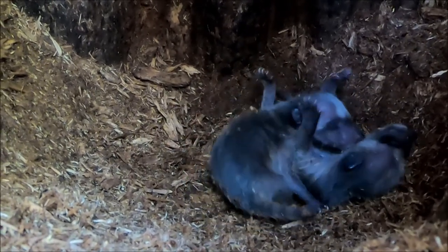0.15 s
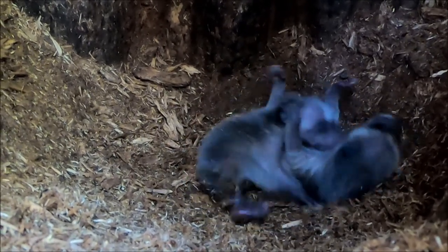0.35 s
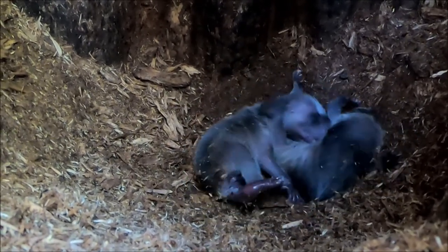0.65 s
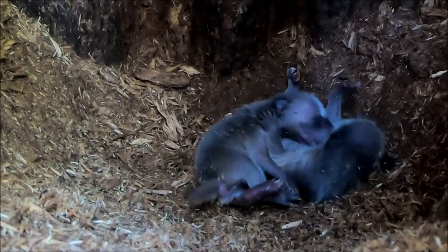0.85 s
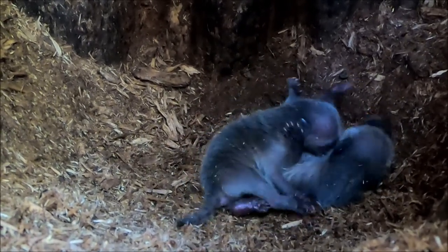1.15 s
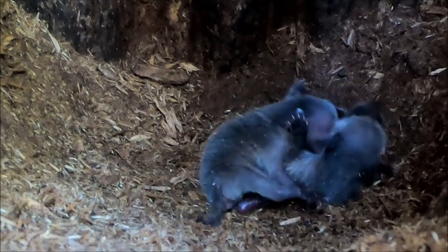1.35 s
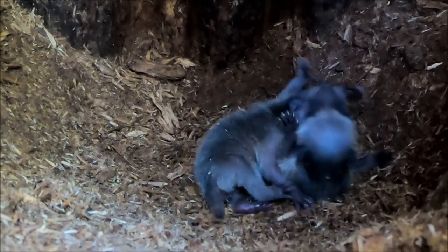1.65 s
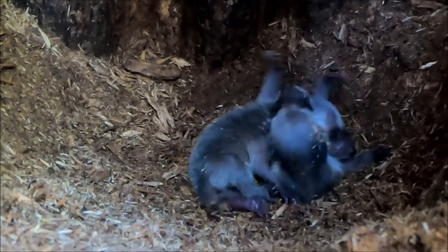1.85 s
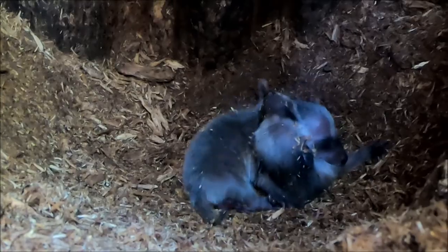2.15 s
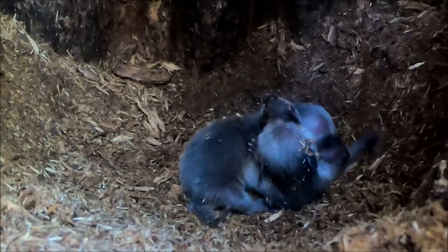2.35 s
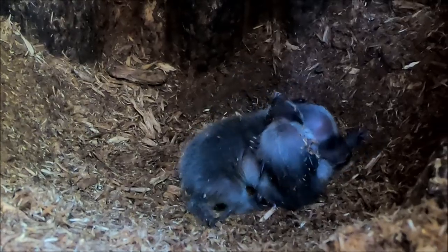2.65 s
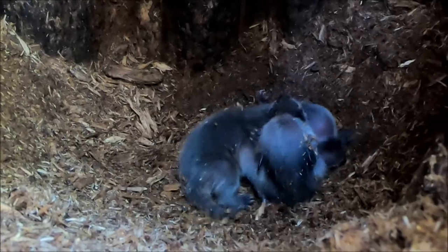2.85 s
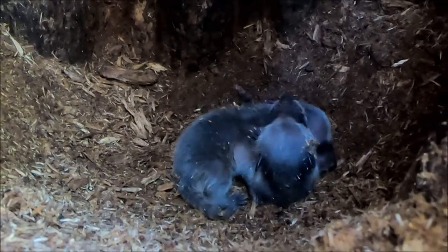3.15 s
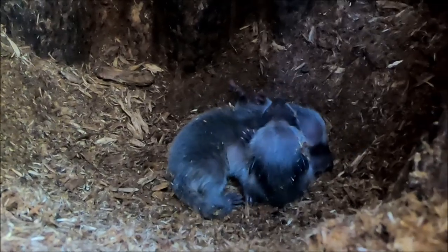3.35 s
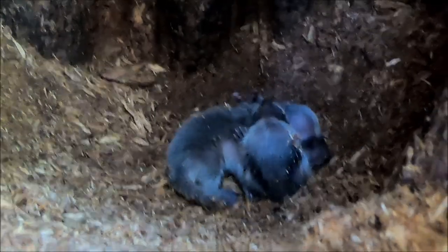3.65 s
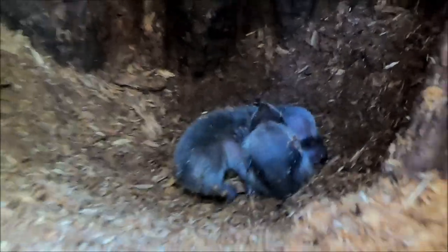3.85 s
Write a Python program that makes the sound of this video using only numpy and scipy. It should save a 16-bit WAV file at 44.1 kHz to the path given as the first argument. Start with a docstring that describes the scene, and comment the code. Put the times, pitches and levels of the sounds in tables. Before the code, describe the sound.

Two baby raccoons screech harshly in broken bursts close to the microphone in a hollow tree, a piercing cry then a shorter squeal, low bumps, then hoarse dull rasps and one last squealing cry.

```python
"""High cries of two baby raccoons, squirming in a hollow tree close to the microphone.
Four cries break between clean squeals and harsh screeches; dull rasps and low grunts join them.
Each voice is a stack of overtones plus pulsed noise, shaped by a throat spectrum; the hollow rings briefly.
Bumps are short low waves; rumble, faint air and the wood litter rustling at the end are shaped noise.
Bumps and rumble are mostly on the right."""
import sys
import numpy as np
from scipy import signal
from scipy.fft import rfft, irfft, next_fast_len
from scipy.io import wavfile
from scipy.ndimage import uniform_filter1d, map_coordinates

SR = 44100
rng = np.random.default_rng(int(sys.argv[2]) if len(sys.argv) > 2 else 0)


def file_out(sig):
    """Save sig as 16-bit WAV at sys.argv[1]."""
    # one column per channel
    cols = np.atleast_2d(sig).T
    # limit, then scale
    lim = np.clip(cols, -1, 1)
    pcm = np.round(lim * 32767).astype(np.int16)
    wavfile.write(sys.argv[1], SR, pcm)


N = 176400  # length in samples: 4 seconds
TOP_HZ = 14500  # nothing sounds above this
ATTACK_S, RELEASE_S = 0.016, 0.039  # fade-in and fade-out of a short call
SAG_OCT = .16  # pitch drop over a screech, rasp or grunt, in octaves
PITCH_SCATTER_OCT = .09  # typical random pitch offset of a screech or rasp, in octaves
SQUEEZES_PER_S = 36  # middle rate of throat squeezes; the actual rate wanders
GRUNT_ROUGH = 0.24  # roughness of grunts and yelps: 0 clean, 1 fully rough


def amp(db):
    """Turn decibels into a gain."""
    return 10 ** (np.asarray(db) / 20)


def unit(x):
    """Scale a sound to an average (rms) level of 1."""
    return x / np.sqrt(np.mean(x ** 2) + 1e-20)


def along(points, hz):
    """Read a curve of (Hz, value) points, spacing the frequencies logarithmically."""
    f, v = np.transpose(points)
    return np.interp(np.log(hz + 1), np.log(f + 1), v)


def curves(rows, t):
    """Read each column after the time column at the times t."""
    s, *cols = np.transpose(rows)
    return [np.interp(t, s, c) for c in cols]


def wobble(rate, size):
    """A smooth random curve through `rate` random points a second."""
    points = rng.standard_normal(8192)
    return map_coordinates(points, [np.arange(size) * rate / SR], mode="wrap")


def filtered(x, response):
    """Multiply the frequencies of x by a response, which may also turn their phase."""
    n = x.shape[-1]
    padded = next_fast_len(n + 4096)
    hz = np.fft.rfftfreq(padded, 1 / SR)
    return irfft(rfft(x, padded) * response(hz), padded)[..., :n]


def coloured(x, spectrum):
    """Shape x with a spectrum in dB, then bring its rms level to 1."""
    return unit(filtered(x, lambda hz: amp(along(spectrum, hz))))


def add(out, s, x):
    """Mix x into out from second s, dropping whatever lies outside."""
    start = round(s * SR)
    x = x[max(0, -start):]
    part = out[max(0, start):][:len(x)]
    part += x[:len(part)]


def envelope(t, length):
    """Fade in, hold and fade out; the fade-out is half done at the given length."""
    fade_in = np.clip(t / ATTACK_S, 0, 1)
    return fade_in * np.clip((length - t) / RELEASE_S + .5, 0, 1)


def folds(hz, rough, wander=.1, jitter=0.024, breaks=1.3, hiss=0.52):
    """Vocal folds: with roughness the pitch lurches, cycles split into subharmonics and pulsed noise joins."""
    n, rough = len(hz), np.clip(rough, 0, 1)
    lurch = rough * (jitter * wobble(500, n) + wander * rough * wobble(70, n))
    phase = 2 * np.pi * np.cumsum(hz * (1 + lurch)) / SR
    # fifteen equally strong harmonics with staggered phases
    tone = unit(sum(np.cos(k * phase + k * k) * (k * hz < TOP_HZ) for k in range(1, 16)))
    # slower waves at 1/2, 1/3 and 1/4 of the pitch
    split = sum(wobble(60, n) * np.cos(phase / k + rough * wobble(90, n)) for k in (2, 3, 4))
    tone = unit(tone * (1 + breaks * rough * split))
    # even out the level over about 12 ms
    tone = tone / np.sqrt(abs(uniform_filter1d(tone ** 2, size=512)))
    noise = unit(rng.standard_normal(n) * (1 + np.cos(phase / 2)))
    return tone + hiss * np.sqrt(rough) * noise


# Voice colour with the mouth wide open. Each row: frequency in Hz, relative level in dB.
WIDE_OPEN_COLOUR = [(350, -19), (1250, -9), (1800, -4.5), (3600, 5.5), (4400, -7), (5400, 5.5),
                    (6400, -8.5), (7900, -18), (9800, -40), (11800, -28), (14500, -46)]
# Voice colour with the mouth half shut, also heard in the rasps. Each row: frequency in Hz, relative level in dB.
HALF_SHUT_COLOUR = [(330, -7), (1300, 0), (1650, 5), (3800, -6.5), (4700, -22.5), (9500, -47),
                    (12000, -32.5), (14500, -66.5)]


def throat(mouth):
    """Blend the two voice colours: the wider the mouth, the brighter the voice."""
    hz = np.geomspace(100, TOP_HZ, 200)
    half_shut, wide = along(HALF_SHUT_COLOUR, hz), along(WIDE_OPEN_COLOUR, hz)
    return np.transpose([hz, (1 - mouth) * half_shut + mouth * wide])


def short_call(length, hz, fall_oct, rough, spectrum, slide_oct=0, rattle_db=3.0, rattle_rate=240):
    """A rattling call with falling pitch; a squeeze can make pitch and resonances jump up and slide down."""
    t = np.arange(0, length + RELEASE_S, 1 / SR)
    pitch = hz * 2 ** (fall_oct * (.5 - t / length))
    rattle = amp(rattle_db * rough * wobble(rattle_rate, len(t)))
    voice = coloured(folds(pitch, rough) * rattle, spectrum)
    squeezes = np.cumsum(SQUEEZES_PER_S * np.exp(.5 * wobble(SQUEEZES_PER_S, len(t)))) / SR
    # playing the voice faster or slower moves pitch and resonances together
    speed = 2 ** (-slide_oct * signal.sawtooth(2 * np.pi * squeezes))
    return map_coordinates(voice, [np.cumsum(speed)], mode="mirror") * envelope(t, length)


def pitch_scatter():
    """A random pitch factor, so that no two calls sit on the same note."""
    return 2 ** (PITCH_SCATTER_OCT * rng.standard_normal())


# Harsh screeches. Each row: start in seconds, length in seconds, level in dB before the hollow,
# mouth opening (0 half shut, 1 wide).
SCREECH_CALLS = [(-.014, 0.026, -32.5, 1.04), (.027, 0.06, -41, .88), (.106, 0.093, -44, .53),
                 (.2, 0.083, -50.5, .25), (.285, .09, -53.5, 0.07), (.55, 0.077, -60.5, .33),
                 (.626, 0.047, -42.5, 1), (.668, 0.033, -32, 1.11), (.711, .06, -34, 1.02),
                 (.789, .053, -31, 1.01), (.839, .067, -31, .88), (.918, 0.18, -32, 1),
                 (1.1, 0.027, -27, 1.06), (1.135, 0.092, -33.5, .91), (1.212, 0.085, -37, .67),
                 (1.29, .13, -46.5, .19), (1.765, .06, -49, .5), (1.811, 0.044, -35, .95),
                 (1.897, 0.053, -39.5, .9), (1.951, 0.066, -44, .3), (3.456, 0.044, -44.5, .74),
                 (3.502, 0.037, -31.5, .5), (3.57, 0.04, -42, .67), (3.653, .1, -43.5, .7)]


def screeches(middle_hz=1744, rough=.76, slide_oct=.05):
    """Very rough high calls, brighter as the mouth opens; each squeeze slides from above to below the pitch."""
    out = np.zeros(N)
    for s, length, db, mouth in SCREECH_CALLS:
        hz = middle_hz * pitch_scatter()
        add(out, s, amp(db) * short_call(length, hz, SAG_OCT, rough, throat(mouth), slide_oct))
    return out


# Left-right balance of the voice. Each row: frequency in Hz, left louder than right by this many dB.
VOICE_BALANCE = [(700, -2), (1150, 15), (1600, -11.5), (2700, 0)]


def hollow(x, hollow_hz=1296, width_hz=240, t60_s=0.13, ring_db=-2):
    """A trunk resonance turns the phase between the sides; the walls add a ring that dies away quickly."""
    def turn(f):
        real, imaginary = hollow_hz ** 2 - f * f, 1j * f * width_hz
        return (real - imaginary) / (real + imaginary)

    def two_sides(f):
        half_db = along(VOICE_BALANCE, f) / 2
        return np.array([amp(half_db), turn(f) * amp(-half_db)])

    pair = filtered(x, two_sides)
    t = np.arange(SR // 10) / SR  # the ring stops after 0.1 s
    # at this rate the ring would fall by 60 dB in t60_s
    tail = rng.standard_normal((2, len(t))) * np.exp(-np.log(1000) * t / t60_s)
    ring = signal.fftconvolve(x[None], tail / np.linalg.norm(tail[0]), axes=1)[:, :N]
    return pair + amp(ring_db) * ring


# Rise and fall of the rumble. Each row: time in seconds, middle level in dB on the right.
RUMBLE_LEVEL = [(0, -39.5), (1.8, -31.5), (2.3, -45.5), (2.75, -51), (3.4, -42)]
# Colour of the rumble. Each row: frequency in Hz, relative level in dB.
RUMBLE_COLOUR = [(35, 0.5), (110, -6.5), (300, -39), (1500, -77.5)]


def rumble(lumps_db=4.0):
    """Deep noise whose level swells and dips at random, separately drawn for each side."""
    noise = coloured(rng.standard_normal((2, N)), RUMBLE_COLOUR)
    level_db = curves(RUMBLE_LEVEL, np.arange(N) / SR)[0]
    return noise * amp(level_db + lumps_db * wobble(14, N))


# Colour of the air noise. Each row: frequency in Hz, relative level in dB.
AIR_COLOUR = [(1200, 3), (3500, -23), (7000, -15.5), (14000, -50)]


def air(level_db=-66):
    """Faint steady noise, separately drawn for each side."""
    return amp(level_db) * coloured(rng.standard_normal((2, N)), AIR_COLOUR)


# Low grunts, alone or under a screech. Each row: start in seconds, length in seconds,
# level in dB before the hollow, middle pitch in Hz.
GRUNT_CALLS = [(0.038, 0.03, -43.5, 471), (0.214, 0.032, -48, 740), (0.844, 0.041, -42, 497),
               (.944, 0.028, -41, 451.5), (0.984, 0.032, -44, 1010), (1.056, .039, -41, 921),
               (1.404, 0.031, -39, 461), (2.74, 0.037, -38, 535), (3.835, .08, -53.5, 1030)]
# Dull voice colour of grunts and yelps. Each row: frequency in Hz, relative level in dB.
GRUNT_COLOUR = [(400, 2), (1100, 2), (5000, -39.5)]


def grunts():
    """Short, slightly rough calls through a dull throat."""
    out = np.zeros(N)
    for s, length, db, hz in GRUNT_CALLS:
        add(out, s, amp(db) * short_call(length, hz, SAG_OCT, GRUNT_ROUGH, GRUNT_COLOUR))
    return out


# Plunging yelps. Each row: start in seconds, level in dB before the hollow, middle pitch in Hz.
YELP_CALLS = [(.36, -46, 600.4), (1.746, -47.5, 1264), (1.998, -43, 1200), (2.829, -43.5, 1822),
              (2.934, -46, 1970), (2.998, -39.5, 700.5), (3.318, -41.5, 1150), (3.501, -34.5, 1171)]


def yelps(length_s=.026, fall_oct=.45):
    """Very short calls with the grunt's colour and a steeply falling pitch."""
    out = np.zeros(N)
    for s, db, hz in YELP_CALLS:
        add(out, s, amp(db) * short_call(length_s, hz, fall_oct, GRUNT_ROUGH, GRUNT_COLOUR))
    return out


# Clean squeals, one list of rows for each. Each row: time in seconds, pitch in Hz,
# level in dB before the hollow.
SQUEAL_PATHS = [
    [(1.215, 1797, -34.5), (1.27, 1746, -40)],
    [(1.83, 1882, -36), (1.865, 1469, -42.5), (1.897, 1844, -40), (1.925, 1637, -42), (1.995, 1592, -49.5)],
    [(2.04, 2035, -53), (2.08, 2140, -77)],
    [(3.6, 1881, -39), (3.635, 1490, -43.5), (3.657, 1719, -43.5), (3.672, 1411, -36.5), (3.72, 1797, -46),
     (3.745, 1503, -43.5), (3.76, 1687, -38.5), (3.785, 1495, -40), (3.825, 1367, -58)],
]


def squeals(mouth=0.99, rough=.22, soften_hz=4300):
    """Stretches where the folds hold a clean, swooping pitch, with softened high overtones."""
    out = np.zeros(N)
    for rows in SQUEAL_PATHS:
        t = np.arange(rows[0][0], rows[-1][0], 1 / SR)
        hz, db = curves(rows, t)
        voice = filtered(folds(hz, rough), lambda f: 1 / (1 + (f / soften_hz) ** 4))
        fades = signal.windows.tukey(len(t), .1)
        add(out, t[0], coloured(voice, throat(mouth)) * amp(db) * fades)
    return out


# Bumps on the microphone. Each row: time of the middle in seconds, strength in dB on the right
# (the wave itself peaks a little lower).
BUMP_HITS = [(1.305, -16.5), (1.631, -16), (1.724, -17.5), (1.791, -15.5), (2.088, -19), (3.464, -23.5)]


def bumps(hz=79, width_s=0.0042):
    """Each bump is a brief low wave inside a bell-shaped swell."""
    out = np.zeros(N)
    for s, db in BUMP_HITS:
        t = np.arange(N) / SR - s
        out += amp(db) * np.sin(2 * np.pi * hz * t) * np.exp(-(t / width_s) ** 2)
    return out


def handling(left_db=-13):
    """Bumps and lumpy rumble, mostly on the right."""
    return (bumps() + rumble()) * amp([[left_db], [0]])


# Hoarse rasps. Each row: start in seconds, length in seconds, level in dB before the hollow.
RASP_CALLS = [(2.178, .03, -65), (2.403, 0.12, -55.5), (2.585, 0.049, -50.5), (2.698, .095, -44),
              (2.815, .05, -37), (2.874, 0.11, -40.5), (2.975, .065, -37), (3.07, 0.057, -40),
              (3.131, .1, -37.5), (3.232, .12, -38.5), (3.355, 0.087, -44.5)]


def rasps(middle_hz=844.7, rough=.75, slide_oct=.13):
    """Low, very rough calls with the mouth half shut and a wide slide at each squeeze."""
    out = np.zeros(N)
    for s, length, db in RASP_CALLS:
        hz = middle_hz * pitch_scatter()
        add(out, s, amp(db) * short_call(length, hz, SAG_OCT, rough, HALF_SHUT_COLOUR, slide_oct))
    return out


# Colour of the rustling litter. Each row: frequency in Hz, relative level in dB.
LITTER_COLOUR = [(500, 2), (11000, -9.5), (15000, -33.5)]


def litter(start_s=3.71, full_s=3.886, level_db=-55, rise_db=20):
    """Crumbled wood rustles ever louder up to full_s: noise with a quickly flickering level."""
    t = np.arange(N) / SR
    # rise_db below full at start_s, and fainter still before
    swell_db = level_db + rise_db * np.minimum((t - full_s) / (full_s - start_s), 0)
    flicker = amp(2.2 * wobble(900, N))
    return coloured(rng.standard_normal((2, N)) * flicker, LITTER_COLOUR) * amp(swell_db)


def cries(peak_s=1.14, width_s=.17, shrill_db=5, shrill_hz=7000):
    """The whole voice; extra treble makes it shriller at the height of the long cry."""
    voice = screeches() + grunts() + yelps() + squeals() + rasps()
    strain = np.exp(-np.square((np.arange(N) / SR - peak_s) / width_s))
    return voice + amp(shrill_db) * strain * filtered(voice, lambda hz: hz > shrill_hz)


def scene():
    """The cries in the hollow, with handling noise, litter and air."""
    return hollow(cries()) + handling() + litter() + air()


def record(dry):
    """Remove everything from the band limit upward."""
    return filtered(dry, lambda hz: hz < TOP_HZ)


dry = scene()
out = record(dry)
file_out(out)
```